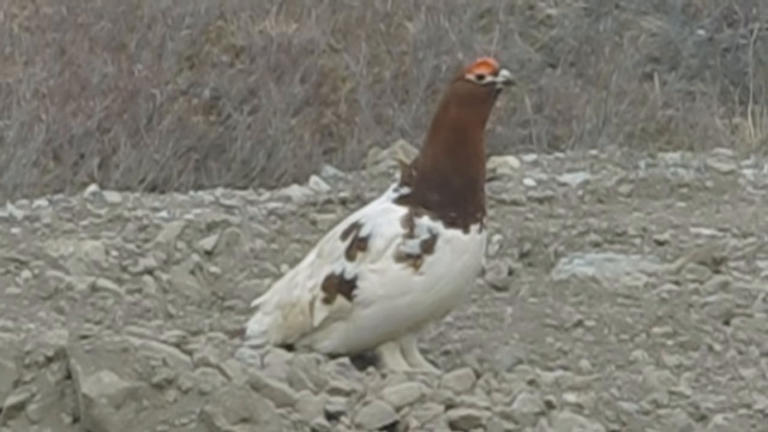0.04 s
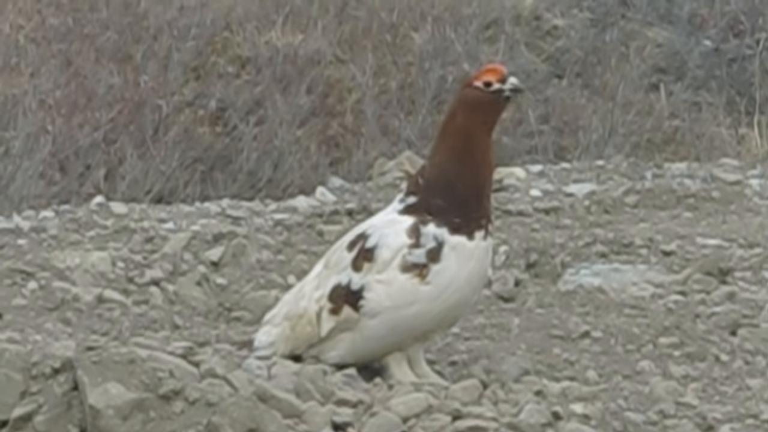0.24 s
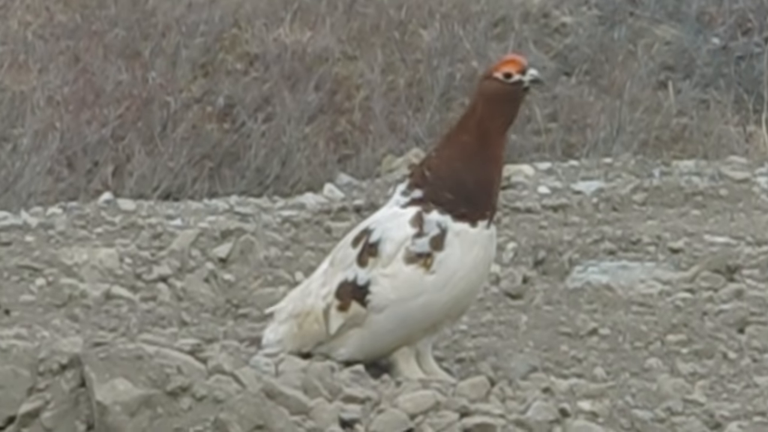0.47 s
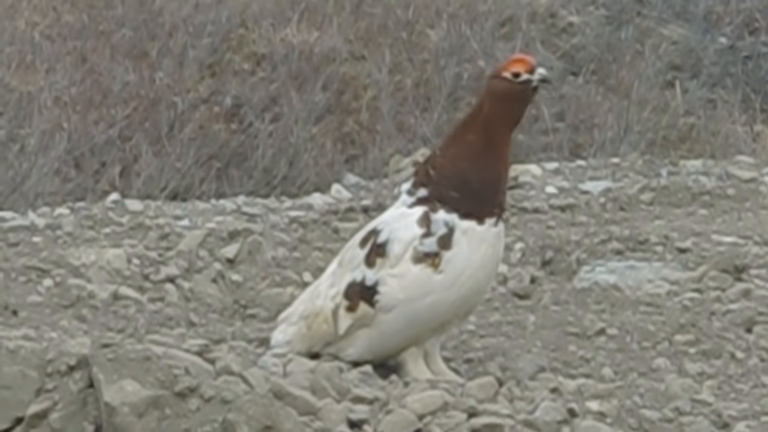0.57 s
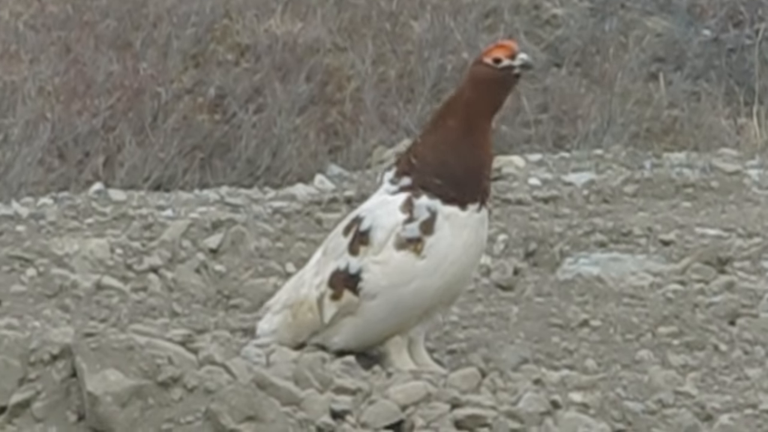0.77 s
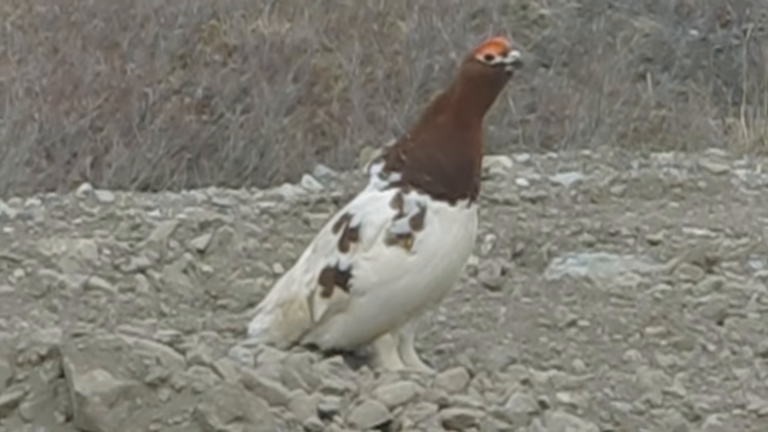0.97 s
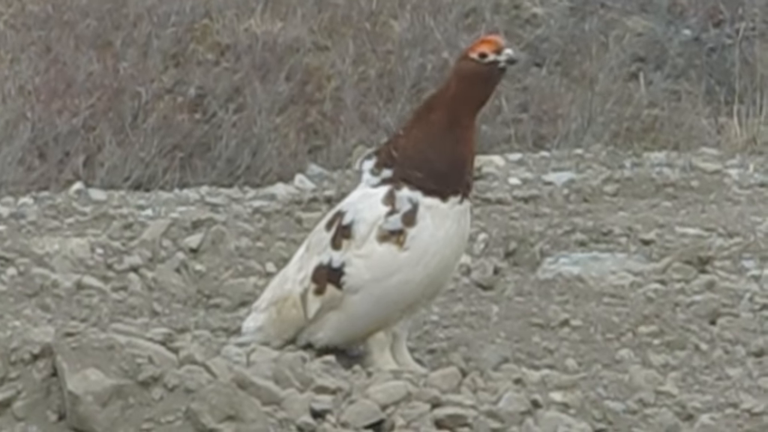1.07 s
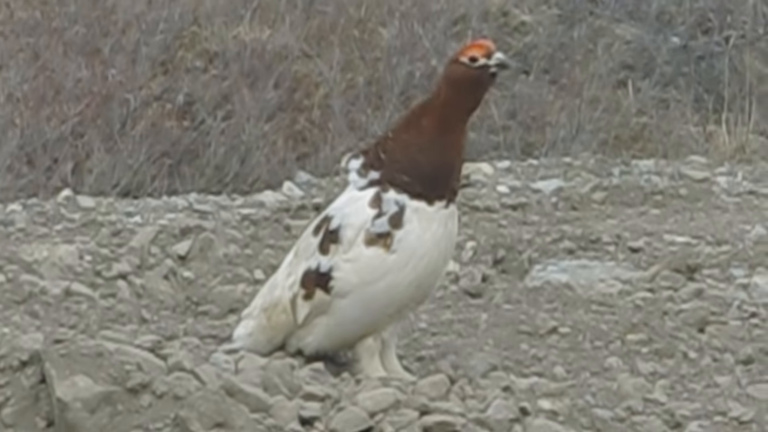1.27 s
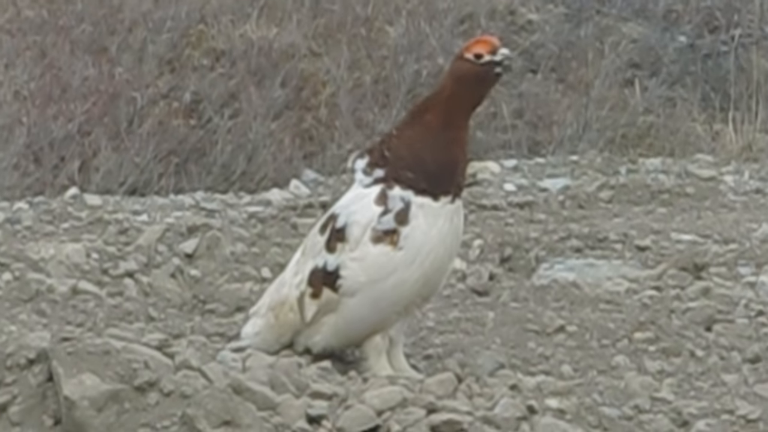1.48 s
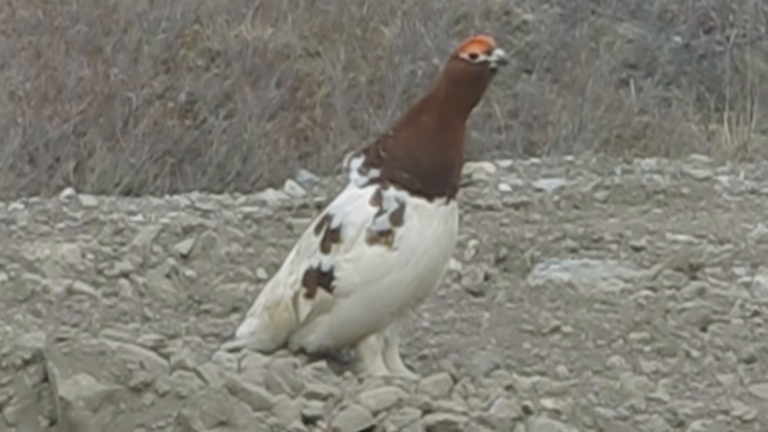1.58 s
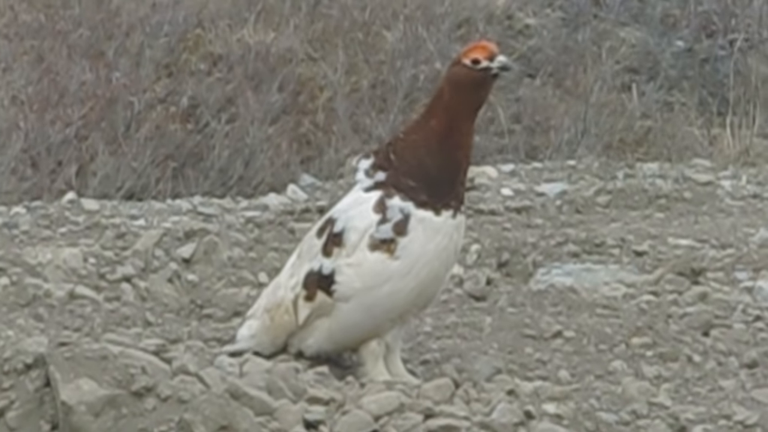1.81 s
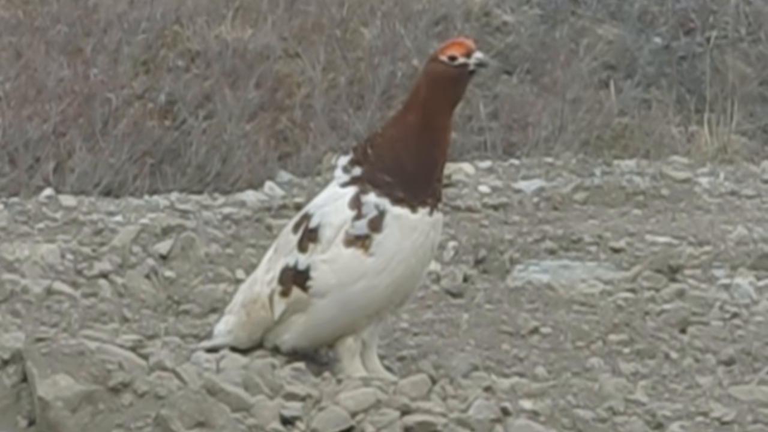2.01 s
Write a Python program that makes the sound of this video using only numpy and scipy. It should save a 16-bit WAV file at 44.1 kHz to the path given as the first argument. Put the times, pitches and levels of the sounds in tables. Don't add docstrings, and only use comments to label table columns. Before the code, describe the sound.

A ptarmigan croaks harshly, each croak a tiny rattle of throat pulses, first spaced apart, then ever faster to the end; open stony ground, faint echoes, light wind bumps and soft microphone hiss.

```python
import sys
import numpy as np
from scipy import signal
from scipy.fft import rfft, irfft, next_fast_len
from scipy.io import wavfile
from scipy.ndimage import uniform_filter1d, map_coordinates

SR = 44100
rng = np.random.default_rng(int(sys.argv[2]) if len(sys.argv) > 2 else 0)


def voltage_ratio(decibels):
    exponent = np.asarray(decibels, float) / 20
    return 10 ** exponent


def unload_wav(signal):
    wavfile.write(
        sys.argv[1],
        SR,
        np.round(np.clip(np.atleast_2d(signal).T, -1, 1) * 32767).astype(np.int16),
    )


N = 90404

# (frequency [Hz], level [dB])
HISS_COLOR = [(150, -9), (300, -3), (600, -4), (1200, -1), (2000, -5), (4000, -11), (16000, -14.5)]
# (frequency [Hz], level [dB])
RUMBLE_COLOR = [(15, 0.5), (40, 3.5), (100, -2.5), (250, -14), (600, -20.5), (1500, -62)]
# (time [s], level [dB])
GUSTS = [
    (0, 1.5),
    (.12, 4),
    (.3, 0),
    (.6, -2.5),
    (.9, 4.5),
    (1.05, 1.5),
    (1.3, -1),
    (1.66, 6),
    (1.8, 6.5),
    (2.05, 0.5),
]
# (time [s], level [dB],
# frequency [Hz], length [cycles])
LOW_BUMPS = [(0.096, -31.5, 44.6, 0.62), (.875, -46, 109, 3.8), (1.137, -35.5, 145, 1.14),
             (1.442, -40.5, 199, 1.54), (1.497, -36, 204, 1.64), (1.546, -32, 173, 1.7),
             (1.646, -19.5, 146, 1.54), (1.657, -28.5, 292, 2.44), (1.693, -30.5, 142, 1.7),
             (1.766, -33, 227, 1.9), (1.792, -26.5, 200, 1.03)]
# (time [s], level [dB])
OPENING_FADE = [
    (0, -4.5),
    (.04, -7.5),
    (.075, -17.5),
    (0.09, -32),
    (0.095, -3),
]
# (frequency [Hz], level [dB], time to fall 60 dB [s])
CLUCK_TONES = [(542, -0.5, .05), (2240, -3, 0.023), (1480, -14, 0.017), (3280, -11, .02)]
# (time of first full pulse [s], level [dB], shortest pulse gap [ms], length [pulses])
CROAK_EVENTS = [(0.198, -23, 6.1, 5.6), (0.4139, -21.5, 5.96, 6.2), (0.5528, -19, 5.6, 6.88),
                (0.6748, -17, 4.92, 6.9), (.7880, -17.5, 5.0, 6.9), (0.8953, -18, 4.77, 6.85),
                (0.9997, -18.5, 4.57, 6.83), (1.0982, -18, 4.35, 7.06), (1.1938, -18, 4.45, 6.93),
                (1.2836, -18, 4.54, 6.68), (1.3662, -17.5, 4.25, 6.26), (1.4367, -17.5, 4.5, 5.8),
                (1.4987, -17, 4.25, 5.46), (1.5570, -17.5, 4.5, 5.16), (1.6154, -17.5, 4.52, 5.0),
                (1.6751, -17.5, 4.63, 4.9), (1.7394, -18.5, 4.87, 4.9)]
# (time [s], stretch [0-1])
NECK_STRETCH = [
    (.2, 0),
    (.41, 0.04),
    (.46, 0.88),
    (.55, 0.76),
    (.6, 1),
    (2, 1),
]
# (time [s], opening at first pulse [0-1], opening reached [0-1], lead-in pulse level [dB],
# change of the seventh resonance [dB])
BEAK_MOVES = [
    (.2, 0, 0.18, -9.5, -1.5),
    (.41, 0, 0.31, -8.5, -1),
    (.55, 0, 0.59, -4.5, 2.5),
    (.68, .08, 0.8, -4, 4.5),
    (.9, 0.31, 0.94, -5.5, 4),
    (1.1, 0.4, 0.96, -2, 1),
    (1.29, 0.57, 0.99, -7, -2),
    (1.4, 1, 0.99, -9.5, -30),
    (1.75, 0.94, 1, -13.5, -29),
]
# (frequency with short neck [Hz], frequency with long neck [Hz],
# shift with open beak [Hz], shift late in a croak [Hz], width [Hz])
RESONANCES = [(870, 830, -50, -190, 125), (1150, 1200, 800, -150, 135), (3000, 2420, -140, -100, 105),
              (5000, 4250, -400, -130, 170), (3500, 3650, 1900, -30, 220), (6300, 5950, -50, -50, 350),
              (7100, 6850, -100, -30, 130), (9000, 7700, 1000, 0, 200), (10300, 10100, 300, 0, 400),
              (12300, 11800, 600, 0, 300), (14300, 14000, 0, 0, 900)]
# (level with short neck [dB], level with long neck [dB],
# change with open beak [dB], change late in a croak [dB])
RESONANCE_LEVELS = [(5, 0, -3.5, 3.5), (3.5, -3, 13.5, -3), (2, -7.5, 17.5, -1.5), (-3.5, -7, 1, -4),
                    (-39, -15.5, 11, -2.5), (-3, -11.5, -12, -18), (-14.5, -9.5, -2, -30),
                    (-17, -16, 3, -17), (-14, -15, -0.5, -8), (-21, -10.5, -12.5, -1), (-25, -25, -4, -8)]
# (frequency [Hz], level [dB])
PUFF_COLOR = [(1000, -13), (3000, -16), (8000, 9), (16000, 4)]
# (delay [s], level [dB], time to fall 60 dB [s])
GROUND_ECHOES = [
    (.006, -31, 0.096),
    (.043, -43, .03),
    (.108, -33, 0.021),
]
# (frequency [Hz], level [dB])
ECHO_COLOR = [(300, 21.5), (1500, 3), (3000, 2.5), (8000, 7)]
# (frequency [Hz], level [dB])
MIC_TOP = [(15500, 2.5), (16000, -18), (17000, -30)]

HISS_DB, RUMBLE_DB = -55, -49.5
NOTCH_HZ, NOTCH_WIDTH_HZ, NOTCH_DB = 7750, 170, -6
FAR_CLUCK_S, FAR_CLUCK_DB = 0.0235, -42

LEAD_MS, START_MS, START_PULSES, TIRE_MS, TIRE_PULSES = 8, 1.9, 0.8, 2.4, 1.0
SWELL_DB, SWELL_PULSES, FADE_DB, FADE_POWER = 4.5, 0.27, 10, 2.43
GAPE_PULSES = 1.71
SAG_AT, SAG_WIDTH = 0.55, 0.033
JITTER_MS, SCATTER_DB, SCATTER_HZ = 0.1, 0.8, 0.006
ONSET_MS, PUFF_DB, PUFF_MS = 0.15, -17.5, 3.2
ROUGH_FROM_HZ, ROUGH = 4400, 0.55
LEAD_DULL_DB = 7.5
BODY_CUT_HZ = 320
CREAK_S, CREAK_GAP_MS = 0.2445, 10.7
CREAK_DB, CREAK_FADE_DB, CREAK_DULL_DB = -40, 0.7, 3


def unit(x):
    return x / np.sqrt(np.mean(x ** 2) + 1e-20)


def along(points, hz):
    f, v = np.transpose(points)
    return np.interp(np.log(hz + 1), np.log(f + 1), v)


def filtered(x, response):
    m = next_fast_len(x.shape[-1] + 8192)
    spectrum = rfft(x, m) * response(np.fft.rfftfreq(m, 1 / SR))
    return irfft(spectrum, m)[..., :x.shape[-1]]


def wobble(rate):
    knots = rng.standard_normal(int(N * rate / SR) + 4)
    return map_coordinates(knots, [np.arange(N) * rate / SR])


def add(track, s, sound):
    part = track[max(round(s * SR), 0):][:len(sound)]
    part += sound[:len(part)]


def hiss():
    def response(f):
        dip_db = NOTCH_DB * np.exp(-((f - NOTCH_HZ) / NOTCH_WIDTH_HZ) ** 2)
        return voltage_ratio(along(HISS_COLOR, f) + dip_db)

    level = voltage_ratio(HISS_DB + 0.21 * wobble(5.2))
    return level * unit(filtered(rng.standard_normal(N), response))


def wind():
    noise = rng.standard_normal(N)
    rumble = unit(filtered(noise, lambda f: voltage_ratio(along(RUMBLE_COLOR, f)) * (f > 12)))
    lumps = voltage_ratio(1.76 * wobble(14) + 3.5 * wobble(40.38))
    gust_db = np.interp(np.arange(N) / SR, *np.transpose(GUSTS))
    out = voltage_ratio(RUMBLE_DB + gust_db) * unit(rumble * lumps)
    for s, db, hz, cycles in LOW_BUMPS:
        turn = np.arange(int(SR * cycles / hz)) * hz / SR
        swell = np.sin(np.pi * turn / cycles)
        push = -np.sign(cycles - 0.7)
        add(out, s, push * voltage_ratio(db) * np.sin(2 * np.pi * turn) * swell)
    return out


def far_cluck():
    out, t = np.zeros(N), np.arange(SR // 20) / SR
    ring = sum(voltage_ratio(db - 60 * t / t60) * np.sin(2 * np.pi * hz * t) for hz, db, t60 in CLUCK_TONES)
    onset = 1 - np.exp(-t / 0.0014)
    add(out, FAR_CLUCK_S, voltage_ratio(FAR_CLUCK_DB) * ring * onset)
    return out


def throat_pulse(neck, gape, late, dull_db, seventh_db, luck):
    t = np.arange(1024) / SR
    count = len(RESONANCES)
    short, long, shift, sag, width = np.transpose(RESONANCES)[..., None]
    short_db, long_db, open_db, late_db = np.transpose(RESONANCE_LEVELS)[..., None]

    hz = short + neck * (long - short) + gape * shift + late * sag
    hz = hz * (1 + SCATTER_HZ * luck[:count, None])
    db = short_db + neck * (long_db - short_db) + gape * open_db + late * late_db
    db = db + SCATTER_DB * luck[count:2 * count, None]
    db[6] += seventh_db
    db -= dull_db * np.log2(hz / hz[0])

    shake = uniform_filter1d(rng.standard_normal((count, len(t))), size=40, axis=1) * np.sqrt(40)
    turn = 2 * np.pi * hz * t + ROUGH * shake * (hz > ROUGH_FROM_HZ)
    sign = (-1) ** np.arange(count)[:, None]
    ring = (sign * voltage_ratio(db) * np.exp(-np.pi * width * t) * np.sin(turn)).sum(0)

    air = unit(filtered(rng.standard_normal(len(t)), lambda f: voltage_ratio(along(PUFF_COLOR, f))))
    puff = air * np.exp(-1000 * t / PUFF_MS)
    puff_level = voltage_ratio(PUFF_DB + late * late_db[-1] - 2 * dull_db)
    onset = 1 - np.exp(-1000 * t / ONSET_MS)
    return (ring + puff_level * puff) * onset


def croaks():
    out, k = np.zeros(N), np.arange(8)
    when, *beak = np.transpose(BEAK_MOVES)
    dull = np.r_[LEAD_DULL_DB, 0 * k]
    for s, db, shortest, length in CROAK_EVENTS:
        luck = rng.standard_normal((9, 24))
        first, reached, lead_db, seventh_db = (np.interp(s, when, column) for column in beak)

        quicken = START_MS * np.exp(-k / START_PULSES)
        tire = TIRE_MS * np.exp(np.minimum(k + 2 - length, 0) / TIRE_PULSES)
        gaps = shortest + quicken + tire + JITTER_MS * luck[1:, -1]
        times = s + np.r_[-LEAD_MS, 0, np.cumsum(gaps)[:-1]] / 1000

        level = -SWELL_DB * np.exp(-k / SWELL_PULSES) - FADE_DB * (k / (length - 1)) ** FADE_POWER
        level = level - 40 * np.maximum(k + 1 - length, 0)
        level = db + np.r_[level[0] + lead_db, level] + SCATTER_DB * luck[:, -2]

        opening = reached + (first - reached) * np.exp(-(k / GAPE_PULSES) ** 1.5)
        gape = np.r_[first * 0.6, opening]
        late = np.r_[0, 1 / (1 + np.exp((SAG_AT - k / length) / SAG_WIDTH))]
        for i, at in enumerate(times):
            neck = np.interp(at, *np.transpose(NECK_STRETCH))
            sound = throat_pulse(neck, gape[i], late[i], dull[i], seventh_db, luck[i])
            add(out, at, voltage_ratio(level[i]) * sound)

    for j, luck in enumerate(rng.standard_normal((7, 24))):
        level = voltage_ratio(CREAK_DB - CREAK_FADE_DB * j + luck[-1])
        sound = throat_pulse(0.44, -0.039, 1.58, CREAK_DULL_DB, 0, luck)
        add(out, CREAK_S + j * CREAK_GAP_MS / 1000, level * sound)
    return signal.sosfilt(signal.butter(4, BODY_CUT_HZ, "high", fs=SR, output="sos"), out)


def ground(x):
    answer, t = np.zeros(SR // 4), np.arange(SR // 8) / SR
    for delay, db, t60 in GROUND_ECHOES:
        burst = rng.standard_normal(len(t)) * voltage_ratio(-60 * t / t60)
        add(answer, delay, voltage_ratio(db) * burst / np.linalg.norm(burst))
    echo = signal.fftconvolve(x, answer)[:N]
    return filtered(echo, lambda f: voltage_ratio(along(ECHO_COLOR, f)))


def scene():
    bird = croaks()
    fade = voltage_ratio(np.interp(np.arange(N) / SR, *np.transpose(OPENING_FADE)))
    place = bird + ground(bird) + wind() + hiss()
    return (place * fade + far_cluck())[None]


def band_limit(x):
    return signal.sosfilt(signal.butter(12, 16980, fs=SR, output="sos"), x)


def record(dry):
    mix = filtered(dry, lambda f: voltage_ratio(along(MIC_TOP, f)))
    return band_limit(mix)


dry = scene()
out = record(dry)
unload_wav(out)
```